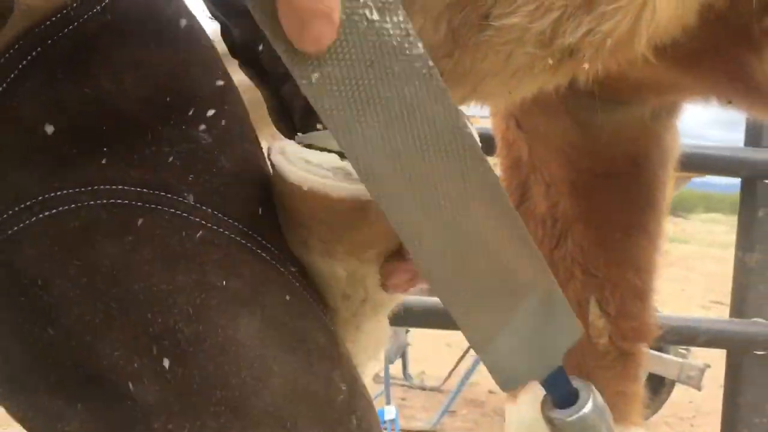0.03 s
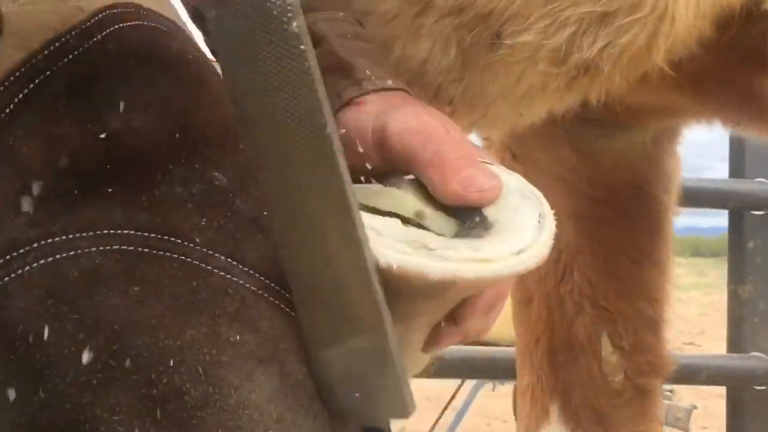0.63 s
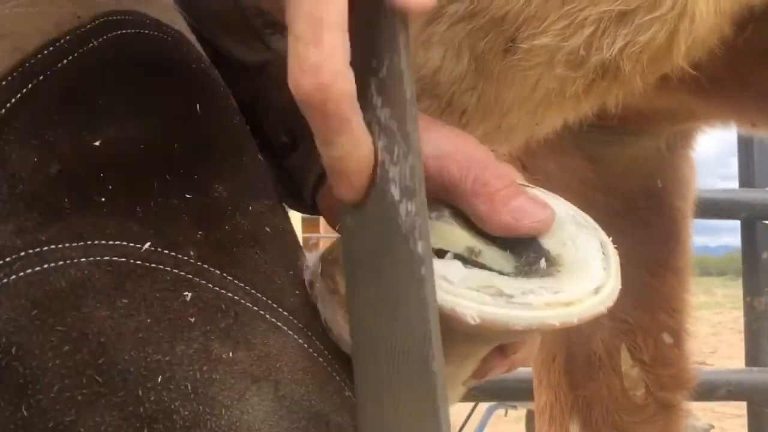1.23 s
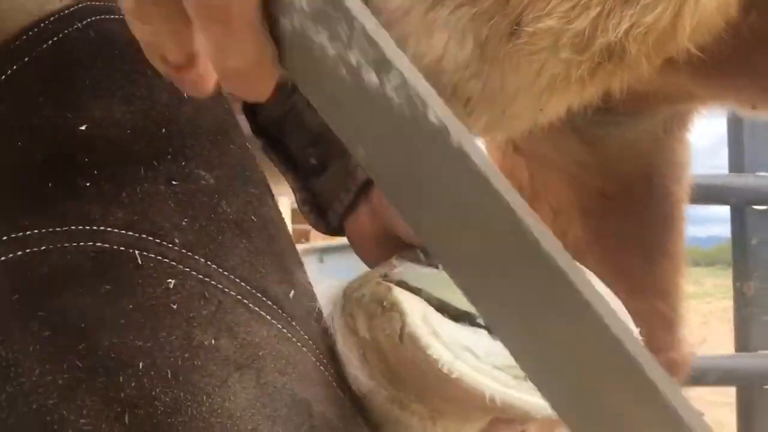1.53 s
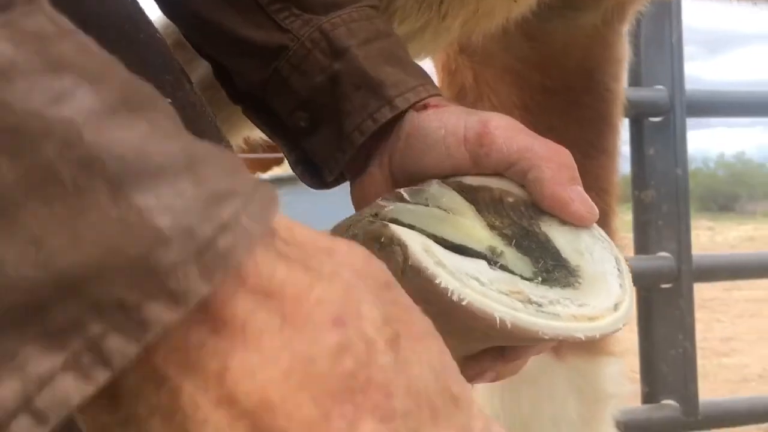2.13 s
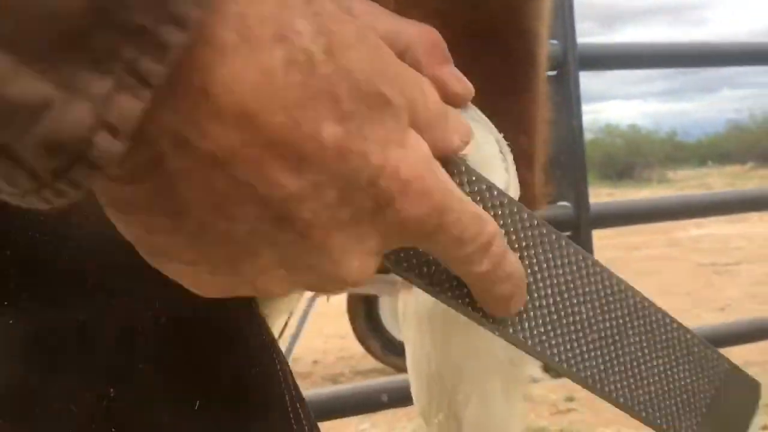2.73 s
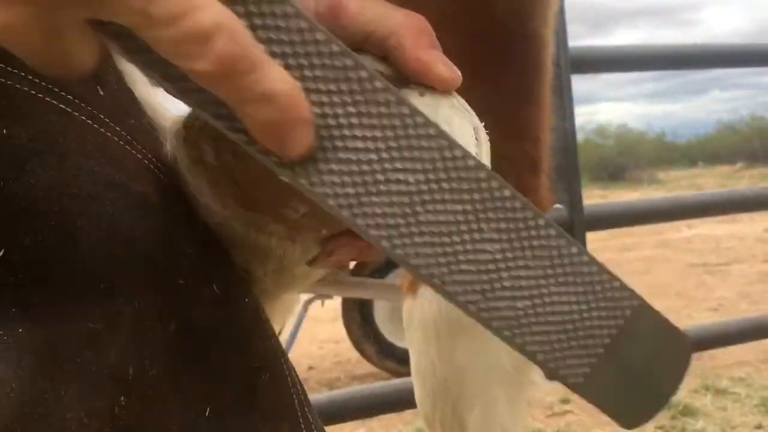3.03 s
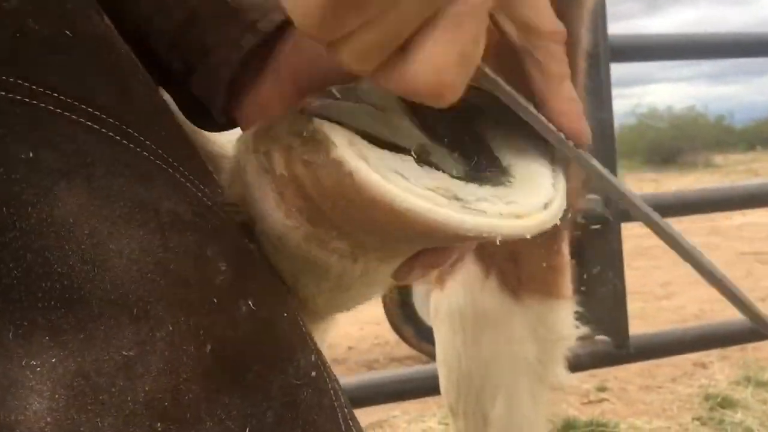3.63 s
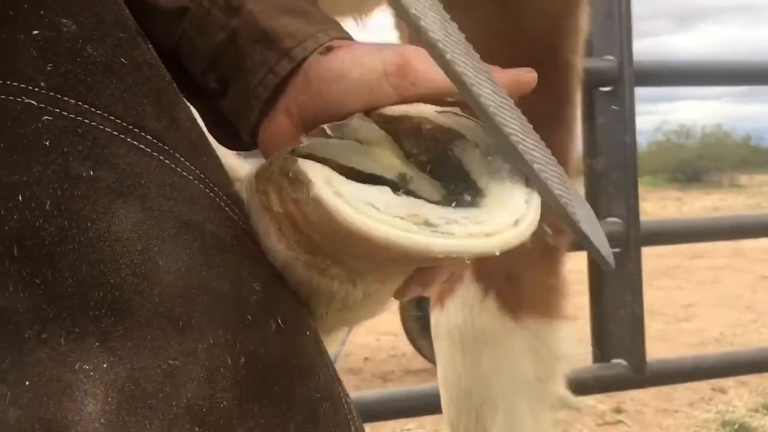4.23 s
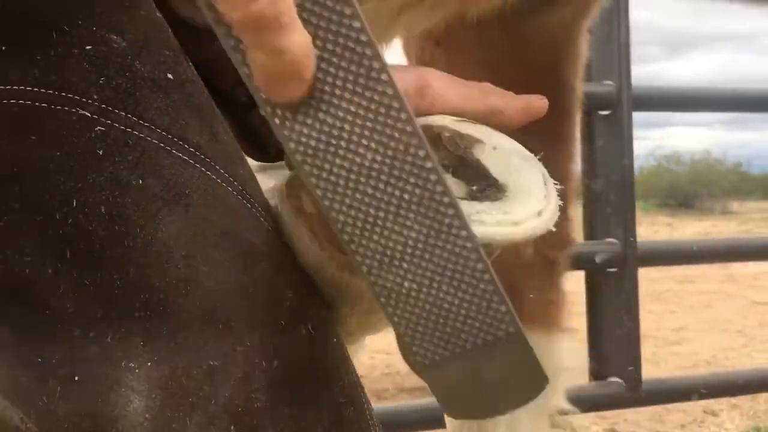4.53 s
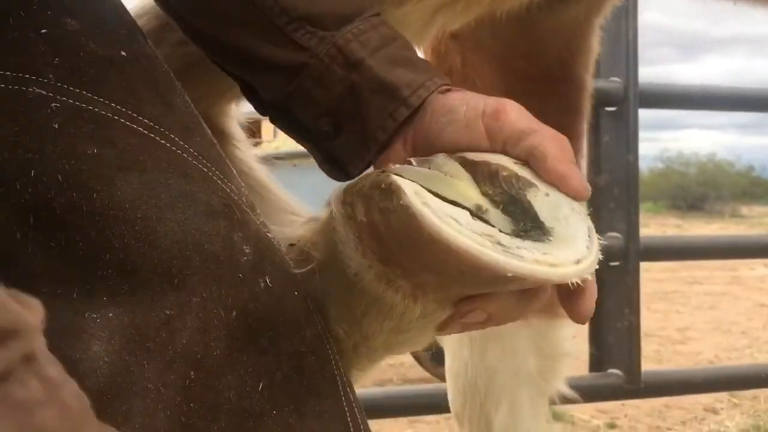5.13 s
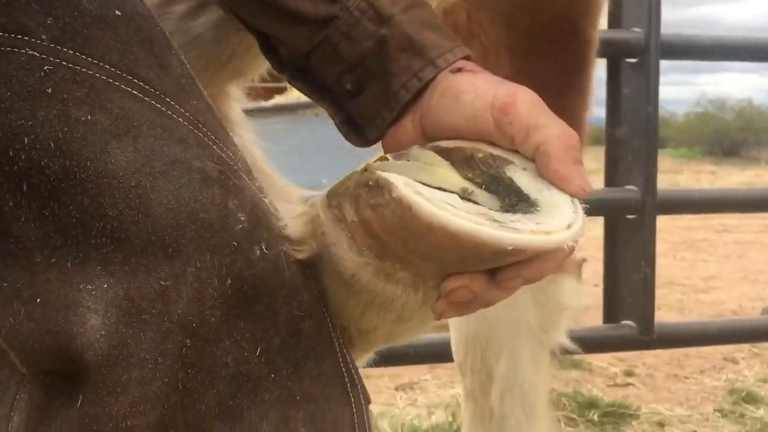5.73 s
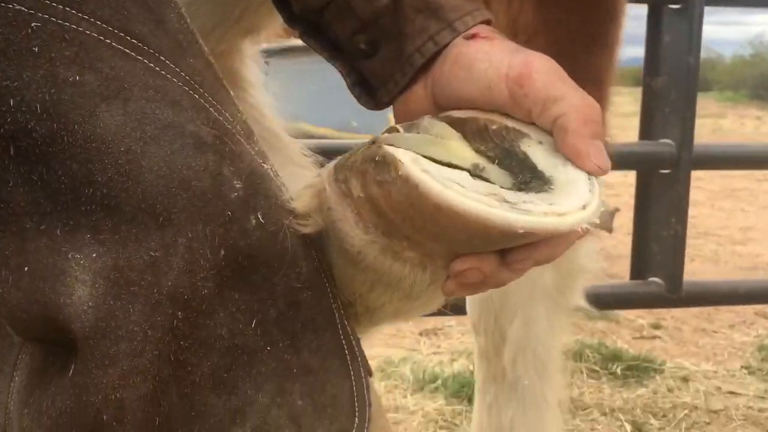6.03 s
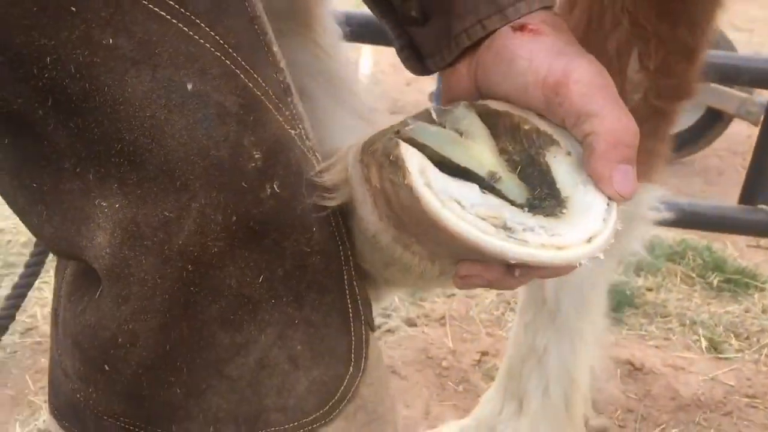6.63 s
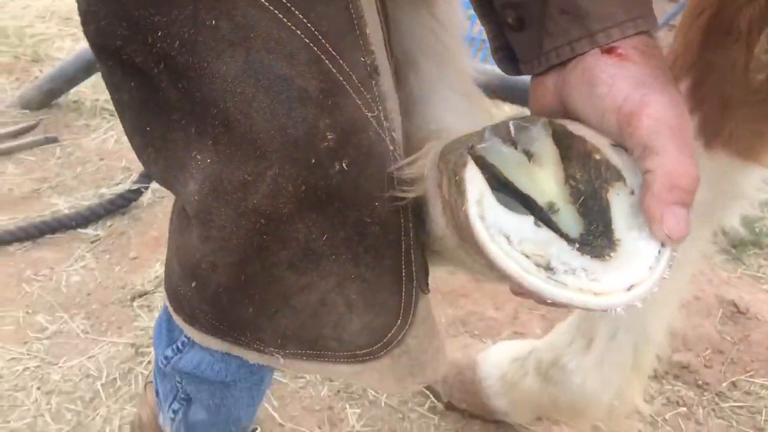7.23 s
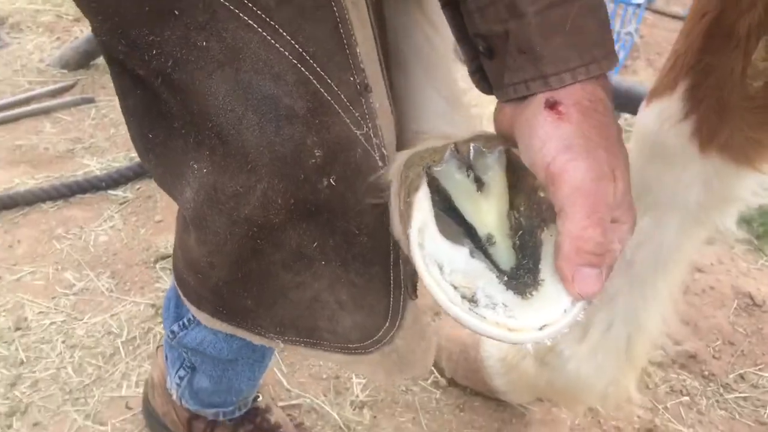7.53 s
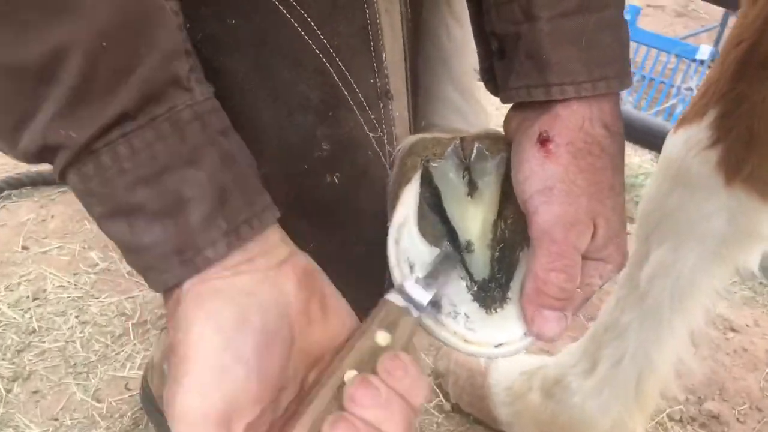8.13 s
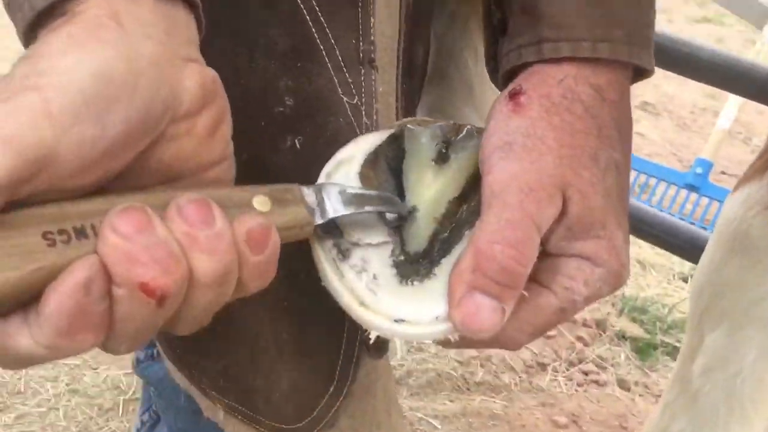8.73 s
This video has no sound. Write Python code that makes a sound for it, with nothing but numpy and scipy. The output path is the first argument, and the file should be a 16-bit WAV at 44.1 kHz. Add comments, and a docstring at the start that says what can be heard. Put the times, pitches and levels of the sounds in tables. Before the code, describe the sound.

Gusty wind rumbles on the microphone as a metal rasp scrapes rhythmically across a hoof, then is put away with a clack.

```python
"""A farrier files a horse's hoof outdoors, while wind rumbles on the microphone. After a few taps come
quick strokes of a steel rasp, its rows of teeth tearing horn while the blade rings. The blade taps and
sings as it leaves the hoof; a second run of strokes follows, and something calls faintly far off.
The tool is put away with a clack and a hand brushes off the shavings. The wind buffets harder, a fainter
call sounds, and at the end a knife pares the sole."""
import sys
import numpy as np
from scipy import signal
from scipy.fft import rfft, irfft, next_fast_len
from scipy.io import wavfile
from scipy.ndimage import uniform_filter1d, minimum_filter1d

SR = 44100
rng = np.random.default_rng(int(sys.argv[2]) if len(sys.argv) > 2 else 0)


def put_to_file(sound):
    """Save the sound as 16-bit audio at rate SR, in the file named by the first command-line argument."""
    columns = np.atleast_2d(sound).T  # one column per channel
    safe = np.clip(columns, -1, 1)
    whole_steps = np.round(safe * 32767)
    wavfile.write(sys.argv[1], SR, whole_steps.astype(np.int16))


N = 392490

# Spectra of tearing fibres and of the driven horn. Each row: frequency in Hz, relative level in dB.
FIBRE_SPECTRUM = [(2060, -45), (3500, 1.5), (5510, -1.5), (6700, -0.5), (8050, -6), (8730, 3.5),
                  (10400, -10), (12800, -4.5), (14100, -15), (15800, -10)]
HORN_SPECTRUM = [(230, 10.5), (350, 7.5), (520, 5.5), (750, 7.5), (1200, 5.5), (2500, 5.5), (3400, 2),
                 (4500, -15), (7000, -45)]
# Modes of the blade pressed on the hoof. Each row: frequency in Hz, bandwidth in Hz, gain in dB.
PRESSED_MODES = [(1233,56,-22.5), (1660,160,-15), (1736,14,-13.5), (2300,300,-12.5), (2950,74,-11.5),
                 (4105,92,-18), (5880,130,-30), (6500,100,-40), (8900,150,-25), (9230,110,-35)]
# Rasp strokes. Each row: start, hardest push and end in seconds; hiss, bite, blade ring and wall gain in
# dB; relative jitter of the tooth rate; top tooth rate in Hz; wall resonance at mid-stroke in Hz.
STROKES = [(0.262,0.328,.425,-34.5,-30,3.5,-3.5,.07,340,1230),
           (0.442,0.492,.568,-43.5,-28,7.5,-4,0.06,410,1050),
           (0.584,0.644,.715,-33.5,-35.5,2.5,0,0.04,590,1400), (0.733,0.796,.86,-39,-26,-1,-14,.05,590,740),
           (0.86,0.908,.97,-34.5,-35,-1.5,-9,0.05,480,1300),
           (1.0,1.071,1.093,-49,-26,-14,-2.5,0.12,590,2200),
           (1.101,1.153,1.215,-40.5,-34.5,1,-16,.12,600,1420),
           (1.254,1.296,1.352,-40.5,-29.5,-1,-1,0.04,650,1980),
           (1.357,1.42,1.495,-39.5,-43,4.5,7,0.03,580,1400), (2.676,2.792,2.82,-46,-34.5,-4,4,0.17,450,650),
           (2.89,2.95,3.03,-50,-29,-2.5,-19,0.2,590,900), (3.066,3.163,3.215,-40,-38.5,1.5,2,0.2,450,900),
           (3.272,3.35,3.465,-46.5,-39.5,-6,6,0.27,400,696),
           (3.498,3.577,3.65,-42.5,-33.5,-7,-3.5,0.22,350,1000),
           (3.616,3.672,3.83,-38.5,-33,-12,-6,.3,350,1048), (3.815,3.851,4.0,-46.5,-37,4,-4,0,350,1557),
           (3.996,4.089,4.17,-36.5,-32,-2,3.5,.045,335,950),
           (4.21,4.25,4.345,-42.5,-28.5,-9,2.5,0,440,1770),
           (4.356,4.425,4.51,-37.5,-33,-3.5,-5,0.02,455,1450),
           (4.526,4.586,4.68,-41,-32,-1.5,0.5,0,715,1394), (4.7,4.76,4.9,-42,-41,4,-2,0.13,520,750)]
def rasp(slowest=.46, top_speed_at=.56, grip=.29, gate_depth=.33, tooth_share=.76, wall_width_hz=260):
    """Forced vibration: tooth rows snap into horn and drive blade and hoof; their rate follows speed."""
    t = clock()
    hiss, bite, rows_per_s, wall_hz, blade_gain, wall_gain, uneven = np.zeros((7, N))
    for start, hardest, end, hiss_db, bite_db, blade_db, wall_db, jitter, top_hz, patch_hz in STROKES:
        on = slice(int(start * SR), int(end * SR))
        lean = np.sin(np.pi * np.interp(t[on], [start, hardest, end], [0, .5, 1])) ** 2
        push = np.tanh(grip * lean) / np.tanh(grip)   # the teeth skim, then sink in
        hiss[on] += from_db(hiss_db) * push ** .76
        bite[on] += from_db(bite_db) * push ** .72
        blade_gain[on], wall_gain[on], uneven[on] = from_db(blade_db), from_db(wall_db), jitter
        travel = (t[on] - start) / (end - start)
        rows_per_s[on] = top_hz * (slowest + (1 - slowest) * np.sin(np.pi / 2 * travel / top_speed_at))
        wall_hz[on] = patch_hz * np.exp(.097 * (travel - .5))   # rises as the contact travels
    rows_passed = np.cumsum(rows_per_s * np.exp(uneven * drift(110))) / SR
    impulses = np.diff(np.floor(rows_passed), prepend=0) * np.sqrt(SR / np.maximum(rows_per_s, 1))
    snaps = tooth_cracks(impulses) * flicker(4.5, 320)   # no two rows cut equally deep
    gate = (1 + gate_depth * np.cos(2 * np.pi * rows_passed)) / np.sqrt(1 + gate_depth ** 2 / 2)
    tearing = gate * grains(spread_db=3)
    chatter = flicker(1.5, 70)   # the blade catches unevenly
    force = bite * chatter * (tooth_share * snaps + np.sqrt(1 - tooth_share ** 2) * tearing)
    clumps = sway(3, 160)
    fibres = hiss * chatter * clumps * (tearing + .5 * snaps)
    # pressure bends the modes, and the travelling contact feeds each now more, now less
    bend = 1 + .022 * np.tanh(drift(11.6))
    ring = sum(from_db(db) * glide(force * blade_gain * sway(5, 6.7), hz * bend, width)
               for hz, width, db in PRESSED_MODES)
    hoof = colour(force, HORN_SPECTRUM) + glide(force * wall_gain, wall_hz, wall_width_hz)
    return from_db(-7) * hoof + ring + from_db(-4) * colour(blade_sheen(fibres), FIBRE_SPECTRUM)


def tooth_cracks(impulses, decay_s=.0015):
    """Convolution: each tooth row sets off a brief noise burst, whose colour changes with each stroke."""
    out, age = np.zeros(N), clock()[:SR // 300]
    for start, _, end, *_ in STROKES:
        on = slice(int(start * SR), int(end * SR))
        crack = rng.standard_normal(len(age)) * np.exp(-age / decay_s)
        out[on] = signal.lfilter(crack / np.linalg.norm(crack), [1], impulses[on])
    return out


def blade_sheen(x, width_hz=170, sheen_db=-5):
    """Modal coupling: high overtones flare and fade as the contact slides past their nodes."""
    overtones_hz = np.linspace(4600, 15000, num=22)
    flares = sum(resonate(x * flicker(7, 22), hz, width_hz) for hz in overtones_hz)
    return (x + from_db(sheen_db) * flares / np.sqrt(len(overtones_hz))) / (1 + from_db(sheen_db) / 2)


# Steel touching hoof or tools. Each row: start in seconds, level in dB, time to fall 60 dB in seconds,
# free ring gain in dB, loss per bounce in dB.
STEEL_TAPS = [(.001,-25.5,0.014,-24,36), (0.043,-28,0.046,-32,3), (0.171,-23,0.06,-45,29),
              (.21,-30.5,0.048,-45,25), (1.971,-34.5,0.032,-12,11), (2.641,-31,.027,-30,30),
              (5.302,-23,0.075,-14,23), (8.239,-40,0.023,-22,20)]
def contacts(bounce_s=.017, landing_s=.015, landing_t60=.035, landing_ring_db=-17):
    """Inelastic impact: each tap rebounds twice, weaker each time; each stroke lands with one touch."""
    bounces = [(start + k * bounce_s, db - k * loss_db, t60, ring_db)
               for start, db, t60, ring_db, loss_db in STEEL_TAPS for k in range(3)]
    landings = [(start + landing_s, bite_db - 1.5, landing_t60, landing_ring_db)
                for start, _, _, _, bite_db, *_ in STROKES]
    return bounces + landings


# Modes of the free blade. Each row: frequency in Hz, gain in dB, time to fall 60 dB in seconds.
FREE_MODES = [(3047,-4,0.18), (3900,-0.5,0.065), (4800,2,.14), (5800,3.5,0.049), (6900,1,0.05),
              (8300,3,0.054), (8600,6,0.087), (9400,-5,0.064), (9300,8,.03), (10650,-6,0.065),
              (11300,3,0.078), (12350,-7,.09), (13900,-3,.03)]
# The lifted blade slides on skin and leather. Each row: centre and half length in seconds, scuff level
# and free ring gain in dB.
BLADE_SLIDES = [(1.816,0.015,-60,12), (1.868,0.025,-58,11.5), (2.016,0.0079,-57,-6), (2.184,0.0096,-53,-13),
                (2.276,.02,-59.5,-3), (2.353,.007,-59,-5.5)]
# Spectrum of steel dabbed on horn. Each row: frequency in Hz, relative level in dB.
SCUFF_SPECTRUM = [(350, -6), (520, 1), (900, -6), (1500, -4), (3200, -6.5), (5000, -19.5), (10000, -21.5),
                  (15500, -29)]
def blade_touches():
    """Damped resonance: a tap or slide sets the blade ringing, the more the freer it is held."""
    scuff, drive = np.zeros((2, N))
    for start, db, t60, ring_db in contacts():
        at = max(int(start * SR), 0)
        age = np.arange(min(SR // 4, N - at)) / SR
        fade = from_db(db - 60 * age / t60)
        scuff[at:at + len(fade)] += fade
        drive[at:at + len(fade)] += fade * from_db(ring_db)
    for centre, half_s, db, ring_db in BLADE_SLIDES:
        slide = from_db(db) * bell_curve((clock() - centre) / half_s)
        scuff += slide
        drive += slide * from_db(ring_db)
    crunch = grains(spread_db=2.5)
    scuff, drive = scuff * crunch, drive * crunch
    free = sum(from_db(db) * resonate(drive, hz, np.log(1000) / np.pi / t60)
               for hz, db, t60 in FREE_MODES)
    held = sum(from_db(db) * resonate(scuff, hz, width) for hz, width, db in PRESSED_MODES)
    ping = resonate(scuff, hz=1740, width_hz=36)   # one mode that the grip hardly damps
    ring = from_db(-8) * free + from_db(-4) * held + from_db(-9) * ping
    return ring + from_db(-5) * colour(scuff, SCUFF_SPECTRUM)


# Blunt knocks of the rasp: on the hoof, and the clack as it is put away.
# Each row: start in seconds, level in dB.
RASP_KNOCKS = [(0.446,-32), (1.973,-32), (3.537,-29), (3.558,-17.5), (3.633,-24), (3.661,-25),
               (5.304,-22.5), (5.311,-20)]
# Hoof wall modes, also used for the clack. Each row: frequency in Hz, gain in dB, time to fall 60 dB
# in seconds.
KNOCK_MODES = [(915,-6,0.0076), (1200,-2,0.016), (1550,-2,0.014), (2040,-7.5,0.015), (2850,-20,.009)]
def blunt_knocks():
    """Impulse response: a blunt contact rings a few heavily damped modes."""
    out, age = np.zeros(N), clock()[:SR // 20]
    for start, db in RASP_KNOCKS:
        at = int(start * SR)
        for k, (hz, mode_db, t60) in enumerate(KNOCK_MODES):
            tone = (-1) ** k * np.sin(2 * np.pi * hz * rng.uniform(.94, 1.06) * age)
            out[at:at + len(age)] += from_db(db + mode_db - 60 * age / t60) * tone
    return out


# Soft rubs and hisses of a hand or the sliding blade. Each row: centre and half length in seconds,
# level in dB.
SOFT_RUBS = [(1.622, 0.063, -50.5), (1.822, 0.02, -49.5), (1.868, 0.023, -55), (2.867, 0.13, -56),
             (3.04, 0.14, -58), (5.269, 0.023, -46.5), (5.476, 0.13, -50.5), (5.536, 0.0092, -44),
             (7.188, 0.16, -57)]
# Their spectrum. Each row: frequency in Hz, relative level in dB.
RUB_SPECTRUM = [(500, -6), (1800, 5), (4000, -3), (9000, -2.5), (15500, -3.5)]
def rubbing():
    """Sliding friction: a hand or the blade gives a soft, fine-grained hiss."""
    return swishes(SOFT_RUBS, RUB_SPECTRUM, spread_db=2.5)


# Knife cuts in the sole. Each row: centre and half length in seconds, level in dB.
KNIFE_CUTS = [(8.277, 0.0039, -53), (8.412, 0.013, -49.5), (8.452, 0.0045, -52.5), (8.69, 0.0099, -39.5),
              (8.727, 0.023, -46)]
# Their spectrum. Each row: frequency in Hz, relative level in dB.
CUT_SPECTRUM = [(900, -3), (2200, 4), (3900, -2), (4900, -18), (7000, -14.5), (10500, -31), (12500, -17),
                (15000, -24.5)]
def knife_paring():
    """Fracture: horn parts under the knife in tiny breaks of very uneven size."""
    return swishes(KNIFE_CUTS, CUT_SPECTRUM, spread_db=6.5)


# Steady flow over the microphone. Each row: time in seconds, level in dB.
BREEZE_LEVELS = [(0.0, -39.5), (0.5, -34), (0.62, -42), (0.86, -40), (1.29, -23.5), (1.58, -34.5),
                 (2.2, -35.5), (2.6, -28), (3.2, -31.5), (3.5, -31), (3.93, -37.5), (4.0, -36.5),
                 (4.15, -33), (4.75, -30), (4.92, -40.5), (5.4, -32), (5.95, -36.5), (6.32, -20.5),
                 (6.68, -41.5), (6.86, -30.5), (7.04, -40.5), (7.31, -26.5), (7.98, -28.5), (8.25, -30.5),
                 (8.5, -24), (8.9, -23.5)]
# Gusts on the microphone. Each row: peak time and half length in seconds, spectral reach in Hz,
# level in dB, thump level in dB.
GUSTS = [(0.978,0.083,158,-24.5,-29), (1.11,0.01,170,-13,-29), (1.15,0.014,110,-21.5,-21.5),
         (1.186,0.014,151,-15.5,-39), (1.294,0.012,150,-12,-20), (1.529,0.015,121,-22.5,-34),
         (1.844,0.02,149,-15,-25), (1.899,0.02,170,-16.5,-25), (2.014,0.022,130,-20.5,-23),
         (2.166,0.0085,129,-33,-24), (2.292,0.023,186,-17.5,-43), (2.397,0.047,195,-18,-33),
         (2.506,0.048,224,-15,-37), (2.551,0.022,444,-14,-20), (2.623,0.071,613,-15.5,-17),
         (2.721,.035,299,-22,-36), (2.818,0.025,524,-16.5,-19), (2.914,0.071,337,-20,-39),
         (3.022,.006,500,-22,-27), (3.074,0.077,440,-15,-29), (3.166,0.021,590,-20,-14),
         (3.25,0.038,240,-21.5,-42), (3.361,0.027,270,-18,-25), (3.488,0.023,134,-19,-29),
         (3.654,0.024,182,-21.5,-27.5), (3.899,0.033,80.64,-27,-21.5), (4.352,0.0042,330,-17.5,-36),
         (4.369,0.01,432,-15.5,-14), (4.479,0.015,149.6,-19.5,-38), (4.553,0.015,304.2,-20.5,-37.5),
         (4.649,0.013,195.6,-17,-23.5), (4.815,0.011,351.6,-15.5,-19.5), (5.018,0.043,180,-23,-26.5),
         (5.167,0.013,303,-16.5,-40), (6.126,0.011,450,-10,-19), (6.144,0.0026,940,-15,-37),
         (6.189,0.0054,675,-7.5,-10), (6.203,0.018,347,-14.5,-22), (6.268,0.0031,860,-10.5,-21),
         (6.292,0.032,670,-13,-9), (6.337,0.011,1380,-17,-13.5), (6.371,0.017,590,-17.5,-25),
         (6.431,0.024,554,-17,-19.5), (6.475,0.0089,910,-14,-25), (6.5,0.021,530,-20.5,-12),
         (6.557,0.021,480,-18.5,-24), (6.584,0.011,860,-12,-16.5), (6.74,0.016,460,-14,-19),
         (6.781,0.014,970,-19,-21), (6.803,0.019,377,-20,-37), (7.065,0.015,287,-21,-22.5),
         (7.166,0.034,615,-15.5,-24), (7.223,0.042,313,-21.5,-16), (7.344,0.017,580,-12,-17),
         (7.375,0.094,496,-17.5,-26), (7.451,0.035,1060,-9.5,-21), (7.49,0.02,1020,-10.5,-18),
         (7.549,.02,563,-20.5,-32), (7.59,0.024,800,-16.5,-35), (7.662,0.025,354,-21.5,-27),
         (7.714,0.022,655,-16,-32), (7.748,0.017,720,-11.5,-37), (7.817,0.018,342,-22,-28),
         (7.965,0.021,300,-17.5,-22), (8.165,0.028,584,-20,-17.5), (8.199,0.01,418,-15,-31),
         (8.327,0.029,260,-19.5,-14.5), (8.397,0.013,433,-14,-31), (8.437,0.078,222,-18,-39),
         (8.558,0.0026,690,-18,-37), (8.652,0.12,223,-19.5,-37.5), (8.736,0.056,302,-14,-14),
         (8.797,0.012,520,-13.5,-13), (8.816,0.0015,705,-2,-22), (8.861,0.018,300,-21.5,-37)]
def airflow(eddy_db=-5, swing_db=5, eddy_reach_hz=117, brightening=.11):
    """Incoherent addition: eddies and gusts sum in power; their spectral reach is a weighted mean."""
    t = clock()[::20]
    breeze_db = np.interp(t, *np.transpose(BREEZE_LEVELS))
    power = from_db(breeze_db + eddy_db + swing_db * drift(15)[::20]) ** 2
    weighted_reach = power * eddy_reach_hz
    for peak, half_s, reach_hz, db, _ in GUSTS:
        swell = gust_swell((t - peak) / half_s)
        gust_power = (from_db(db) * swell) ** 2
        power += gust_power
        weighted_reach += gust_power * reach_hz * swell ** brightening
    return np.interp(clock(), t, power), np.interp(clock(), t, weighted_reach / power)


def gust_swell(age, skew=1.275, squareness=1.55):
    """Skewed envelope: a gust builds faster than it leaves; age is in half lengths from its peak."""
    distance = np.abs(age * np.where(age < 0, skew, 1 / skew))
    core = np.exp(-np.minimum(distance ** squareness, 20))
    skirt = from_db(-20) * bell_curve(distance / 2.93)
    return np.maximum(core, skirt)


def wind_buffets(steepness=1.127, port_hz=900, port_db=4.5):
    """Turbulence: faster air reaches higher frequencies, and small eddies make it surge and sputter."""
    power, reach_hz = airflow()
    sputter = unit_power(drift(171) + .52 * drift(45))
    reach_hz = (reach_hz + 30) * np.exp(.17 * sputter)
    level = np.sqrt(power * SR / reach_hz) * unit_power(from_db(2 * sputter))
    white, out = rng.standard_normal((2, N)), 0
    edges_hz = np.geomspace(55, 10000, num=19)
    for k, (low, high) in enumerate(zip(edges_hz, edges_hz[1:])):
        band = signal.sosfilt(signal.butter(2, [low, high], "band", fs=SR, output="sos"), white[k % 2])
        band = signal.sosfilt(signal.butter(4, 1.2 * high, fs=SR, output="sos"), band)
        hz = np.sqrt(low * high)
        port = from_db(port_db * np.exp(-np.log2(hz / port_hz) ** 2 / 2))   # hollow microphone opening
        out += port * band * np.exp(-(hz / reach_hz) ** steepness)
    return level * out


# Spectrum of slow turbulence. Each row: frequency in Hz, relative level in dB.
RUMBLE_SPECTRUM = [(20, -40), (32, -22.5), (45, 2.5), (65, 2), (100, -4.5), (160, -6), (260, -12.5),
                   (400, -21), (700, -36), (1200, -99)]
def wind_rumble(waver_db=4, wake_lag_s=.012, wake_spread_s=.0055):
    """Pressure fluctuation at the microphone: it wavers with the breeze and thumps in each gust's wake."""
    t = clock()[::20]
    breeze_db = np.interp(t, *np.transpose(BREEZE_LEVELS))
    power = from_db(breeze_db + 1 + waver_db * drift(9)[::20]) ** 2
    for peak, half_s, *_, thump_db in GUSTS:
        wake = gust_swell((t - peak - wake_lag_s) / (half_s + wake_spread_s))
        power += (from_db(thump_db) * wake) ** 2
    flow = colour(rng.standard_normal(N), RUMBLE_SPECTRUM)
    even_flow = flow / np.sqrt(uniform_filter1d(flow ** 2, size=3000))
    fluttering = unit_power(even_flow * sway(3, 28))
    return fluttering * np.sqrt(np.interp(clock(), t, power))


# Far calls. Each row: start and end in seconds, first and last pitch in Hz, level and hoarseness in dB.
CALLS = [(3.552, 4.352, 3462, 3300, -51, -6), (6.72, 7.148, 1950, 1860, -63, -3)]
def far_calls(waver=.015, overtone_db=-9.5, hoarse_hz=2230, width_hz=350):
    """Frequency modulation: a thin note and its octave waver and sink over a band of hoarse noise."""
    out = np.zeros(N)
    for start, end, first_hz, last_hz, db, hoarse_db in CALLS:
        progress = np.clip((clock() - start) / (end - start), 0, 1)
        hz = (first_hz + (last_hz - first_hz) * progress) * (1 + waver * drift(120))
        phase = 2 * np.pi * np.cumsum(hz) / SR
        tone = np.sin(phase) + from_db(overtone_db) * np.sin(2 * phase)
        band = resonate(rng.standard_normal(N), hoarse_hz, width_hz)
        hoarse = unit_power(resonate(band, hoarse_hz, width_hz))
        out += from_db(db) * np.sin(np.pi * progress) * (tone + from_db(hoarse_db) * hoarse)
    return out


# Spectrum of the open yard. Each row: frequency in Hz, relative level in dB.
YARD_SPECTRUM = [(530, -31), (900, 0.5), (1190, -2), (1830, -2), (2780, -7), (3250, -9.5), (11400, -16.5),
                 (15800, -17)]
def yard_air(level_db=-62.5):
    """Stationary noise: the faint, even hiss of the open air."""
    return from_db(level_db) * colour(rng.standard_normal(N), YARD_SPECTRUM)


def from_db(db):
    """Decibels to amplitude ratio."""
    return 10 ** (np.asarray(db) / 20)


def unit_power(x):
    """Normalisation to a mean square of 1."""
    return x / np.sqrt(np.mean(x ** 2) + 1e-20)


def clock():
    """Sample times in seconds."""
    return np.arange(N) / SR


def bell_curve(x):
    """Gaussian envelope with a peak of 1."""
    return np.exp(-np.minimum(x ** 2, 20))


def drift(rate_hz):
    """Low-passed noise: a random wander of spread 1."""
    pole = np.exp(-40 * np.pi * rate_hz / SR)
    white = rng.standard_normal(N // 20 + 2002)
    slow = signal.lfilter([1], [1, -2 * pole, pole * pole], white)[2000:]
    return np.interp(np.arange(N) / 20, np.arange(len(slow)), unit_power(slow))


def flicker(spread_db, rate_hz):
    """Log-normal modulation: a random gain of unit power."""
    return unit_power(from_db(spread_db * drift(rate_hz)))


def sway(depth_db, rate_hz):
    """Bounded modulation: a random gain of unit power with softly limited swings."""
    return unit_power(from_db(depth_db * np.tanh(drift(rate_hz))))


def grains(spread_db):
    """Amplitude-modulated noise: the white crunch of tiny, uneven fractures."""
    return unit_power(rng.standard_normal(N) * flicker(spread_db, 1500))


def swishes(table, spectrum, spread_db):
    """Source and filter: grainy noise swells and fades, shaped by a spectrum."""
    t = clock()
    swell = sum(from_db(db) * bell_curve((t - centre) / half_s) for centre, half_s, db in table)
    return colour(swell * grains(spread_db), spectrum)


def colour(x, spectrum):
    """Spectral shaping, with a steep fall below the first row; white noise keeps its power."""
    hz, db = np.transpose(spectrum)
    size = next_fast_len(N + SR // 4)
    bins_hz = np.maximum(np.arange(size // 2 + 1) * SR / size, 1)
    gain = from_db(np.interp(np.log(bins_hz), np.log(hz), db))
    gain /= np.sqrt(1 + (hz[0] / bins_hz) ** 8)
    return irfft(rfft(x, size) * unit_power(gain), size)[:N]


def resonate(x, hz, width_hz):
    """Two-pole resonance; white noise keeps its power."""
    radius = np.exp(-np.pi * width_hz / SR)
    feedback = [1, -2 * radius * np.cos(2 * np.pi * hz / SR), radius ** 2]
    return np.sqrt((1 - radius ** 2) / 2) * signal.lfilter([1, 0, -1], feedback, x + 1e-18)


def glide(x, hz, width_hz):
    """Time-varying resonance, sounding only while it is driven; white noise keeps its power."""
    on, out = x != 0, np.zeros(N)
    carrier = np.exp(2j * np.pi * np.cumsum(hz[on]) / SR)
    radius = np.exp(-np.pi * width_hz / SR)
    envelope = signal.lfilter([1], [1, -radius], x[on] / carrier)
    out[on] = np.sqrt(2 * (1 - radius ** 2)) * np.real(carrier * envelope)
    return out


def scene():
    """Superposition in a free field: all sources add in one channel, with no echo."""
    air = yard_air()
    farrier = rasp() + blade_touches() + blunt_knocks() + rubbing() + knife_paring()
    return (farrier + wind_buffets() + wind_rumble() + far_calls() + air)[None]


def record(dry, ceiling=.71, cutoff_hz=15850):
    """Peak limiting holds down the strongest gusts; a steep low-pass cuts the top."""
    allowed = np.minimum(1, ceiling / (np.abs(dry) + 1e-9))
    gain = uniform_filter1d(minimum_filter1d(allowed, size=45), size=45)
    return signal.sosfilt(signal.ellip(12, .1, 90, cutoff_hz, fs=SR, output="sos"), dry * gain)


dry = scene()
out = record(dry)
put_to_file(out)
```